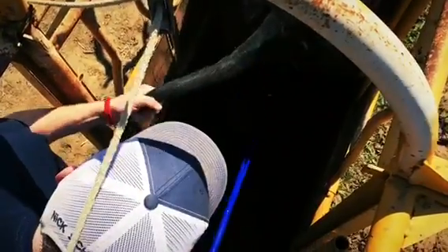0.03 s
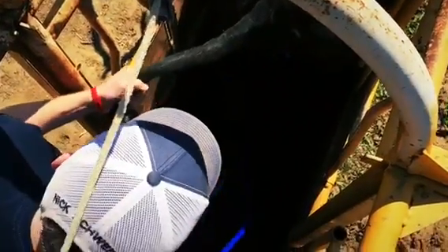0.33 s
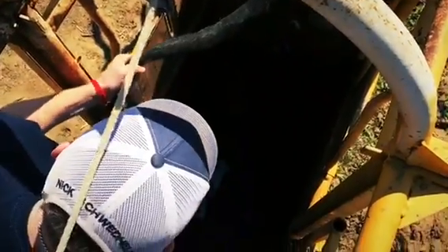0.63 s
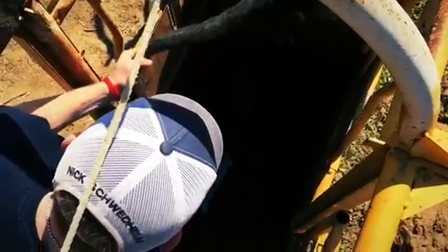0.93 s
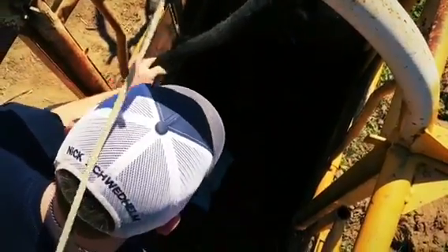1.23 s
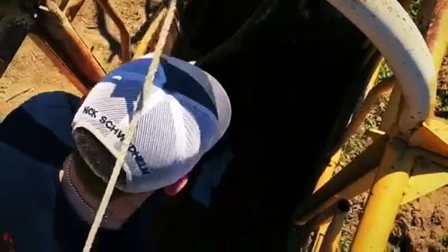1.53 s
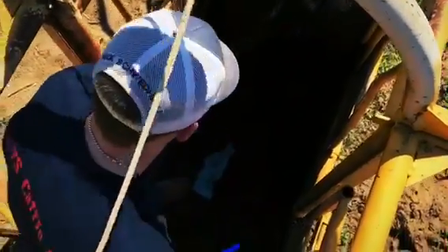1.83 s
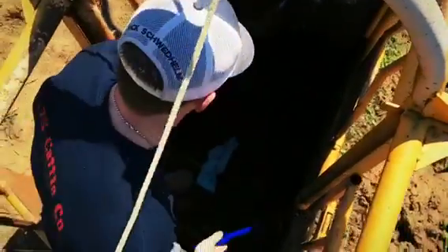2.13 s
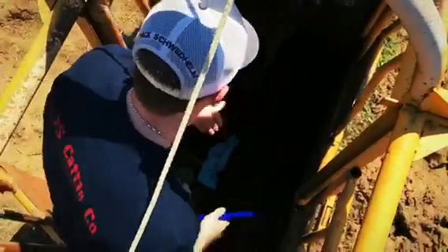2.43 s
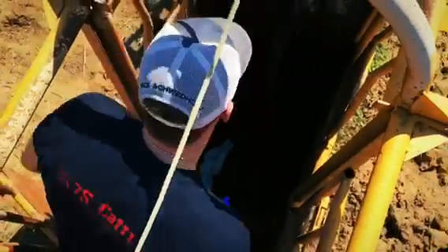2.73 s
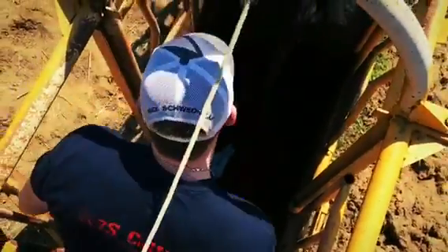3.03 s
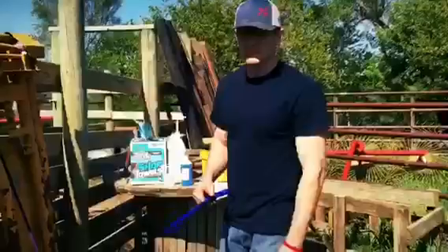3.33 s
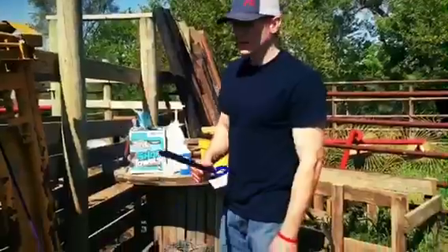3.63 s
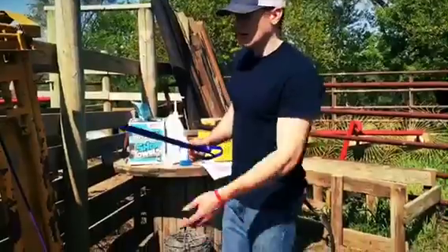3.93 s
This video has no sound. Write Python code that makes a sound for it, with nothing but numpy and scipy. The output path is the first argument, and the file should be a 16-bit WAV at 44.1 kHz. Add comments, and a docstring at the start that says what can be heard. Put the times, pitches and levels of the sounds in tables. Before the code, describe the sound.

A metal gate bangs shut near the end of a quiet outdoor stretch. Before it, wind puffs hit the microphone, a small bird whistles faintly and pipes clink lightly. A latch clanks just ahead of the ringing slam.

```python
"""A quiet farmyard, by a steel cattle chute. Light wind puffs on the microphone over a soft hiss and
a low hum, perhaps a far motor. A rail squeaks faintly, clothes rustle, a hand slides on a rope, a small
bird whistles in the trees and pipes clink twice. Then the chute's latch clanks and its gate slams:
the struck steel rings in its modes, the frame rattles and drones on, and the pens around answer."""
import sys
import numpy as np
from scipy import signal
from scipy.fft import rfft, irfft, next_fast_len
from scipy.io import wavfile
from scipy.ndimage import map_coordinates

SR = 44100
rng = np.random.default_rng(int(sys.argv[2]) if len(sys.argv) > 2 else 0)


def wrap_up_sound(samples):
    """Save the sound to the file named by the first command line argument, as 16-bit audio."""
    columns = np.atleast_2d(samples).T
    # keep every value between -1 and 1, then stretch to whole-number steps
    tamed = np.clip(columns, -1, 1)
    steps = np.round(tamed * 32767).astype(np.int16)
    wavfile.write(sys.argv[1], SR, steps)


N = 176400
T = np.arange(N) / SR

# wind rumble on the microphone (time [s], level [dB])
WIND_LEVEL = [(0, -52), (1.6, -49.5), (2.1, -43.5), (4, -52)]
# its spectrum (frequency [Hz], relative level [dB])
WIND_COLOUR = [(22, -23), (55, 6.5), (110, -6.5), (220, -12), (900, -58.5)]
# eddies hitting the microphone (time [s], level [dB], starting pitch [Hz])
PUFFS = [(1.046, -37, 200), (1.231, -36, 302), (1.256, -30, 290), (1.412, -36.5, 195), (1.81, -34, 255),
         (1.969, -32, 170), (2.07, -26.5, 283), (2.083, -21.5, 253), (2.108, -30.5, 202),
         (2.135, -28.5, 202), (2.302, -32, 280), (2.365, -14, 436), (2.4057, -19, 277), (2.713, -33, 201)]
# hollow rush behind an eddy (frequency [Hz], relative level [dB])
CHURN_COLOUR = [(300, 5), (750, -8.5), (4000, -58.5)]
# far hum, harmonics 1 to 3 (starting level [dB])
HUM_HARMONICS = [-50, -57, -66]
# hiss of the open yard (time [s], level [dB])
AIR_LEVEL = [(0, -59.5), (.22, -62), (.45, -69.5), (1.3, -64), (1.7, -67), (3.3, -65.5), (4, -49)]
# its spectrum (frequency [Hz], relative level [dB])
AIR_COLOUR = [(300, 7.5), (500, 0.5), (1800, -2.5), (3000, -9.5), (6000, -16.5), (15500, -26)]
# rustles of cloth and rope (time [s], length [s], level [dB])
RUSTLES = [(1.028, 0.023, -63), (1.07, 0.53, -71)]
# their spectrum (frequency [Hz], relative level [dB])
CLOTH_COLOUR = [(300, -33), (1500, 4), (5000, -2.5), (15000, -15)]
# slides on the rope (time [s], length [s], start pitch [Hz], end pitch [Hz], level [dB])
SCRAPES = [(1.117, 0.057, 1650, 2900, -65.5), (1.139, 0.048, 3350, 6400, -67),
           (1.2, 0.051, 7360, 8500, -71)]
# bird notes (delay [s], length [s], start [Hz], middle [Hz], end [Hz], relative level [dB])
SLOW_MOTIF = [(0, 0.038, 3840, 3575, 2930, -2), (.045, 0.05, 3650, 4290, 4480, -2.5),
              (.11, .07, 6250, 5400, 4980, -5.5)]
QUICK_MOTIF = [(0, .045, 6400, 5440, 4620, -1.5), (.085, 0.028, 3950, 3830, 3660, -5.5),
               (.12, .036, 3200, 3700, 4080, 1)]
# repeats of each motif (time [s], level [dB])
SLOW_SONG = [(1.458, -68), (1.71, -63.5), (1.963, -65)]
QUICK_SONG = [(2.268, -67.5), (2.535, -69), (2.812, -71.5)]
# each steel part's crowd of lesser modes (frequency [Hz], relative level [dB])
PIPE_COLOUR = [(200, -16), (900, -4), (2400, 3.5), (2700, -4), (3200, -2), (15000, -36)]
LATCH_COLOUR = [(100, -9), (500, -11), (850, 1), (2100, -1), (2600, -8.5), (3700, -1), (4800, -17),
                (9000, -23), (15500, -44)]
GATE_COLOUR = [(50, -20), (140, -6.5), (380, -7.5), (600, 0.5), (1300, 2), (2400, 2.5), (3500, -7),
               (5500, -12.5), (8000, -17.5), (11400, -19), (12800, -24.5), (15500, -33)]
FRAME_COLOUR = [(60, -37), (200, 1), (350, 5), (1200, -6.5), (6000, -50)]
# decay of those lesser modes (frequency [Hz], T60 [s])
STEEL_T60 = [(150, 0.15), (1500, 0.17), (13000, 0.11)]
# each part's clear modes (frequency [Hz], relative level [dB], T60 [s])
PIPE_MODES = [(1205, -4, .4), (1605, -12, 3.6), (1696, -5.5, 2.9), (1780, -5.5, 1.2), (2054, -8, .9),
              (2237, -4, .65)]
LATCH_MODES = [(760, -5, 1), (2850, -10, 0.074)]
FRAME_MODES = [(131.1, -5, 1.35), (216.6, -6.5, 0.92), (257.9, -7.5, 6), (334.3, -2.5, 0.53),
               (421, -7, 2.1)]
# the gate's clear modes (frequency [Hz], relative level [dB])
GATE_MODES = [(140.9, -0.5), (570, -3), (916, -5), (1058, -2.5), (1431, -10), (1583, -6), (1682, -8),
              (1760, -8.5), (1854, -8.5), (1987, 3), (2316, -9), (2500, -8), (2671, -8.5), (2805, -13),
              (3348, -9), (3547, -6), (4166, -8.5), (5642, -17.5), (5836, -16)]
# taps on small pipes (time [s], level [dB], factor on mode frequencies [ratio])
CLINKS = [(1.857, -61, .935), (2.506, -50, 0.99)]
# reverberation of the pens (frequency [Hz], T60 [s], gain [dB])
PEN_REVERB = [(347, 4, -3), (895, 0.8, -15.5), (2180, .42, -11), (13000, 0.33, -17)]
# blows on the gate (time [s], level [dB], treble tilt [dB/octave])
GATE_BLOWS = [(3.37, -51, -6.5), (3.5586, -16.5, 0.5), (3.5657, -16, 1.56), (3.607, -33.5, -3.5),
              (3.789, -44.5, -1.5), (3.945, -43, -4), (3.958, -40.5, -5)]
# latch contacts (time [s], level [dB])
LATCH_HITS = [(3.4295, -26.5), (3.439, -43)]
# jolts of the heavy frame (time [s], level [dB])
FRAME_JOLTS = [(3.455, -26), (3.575, -28.5), (3.925, -35)]


def amp(db):
    """Decibels to gain."""
    return 10 ** (np.asarray(db) / 20)


def unit(x):
    """Scale to rms 1."""
    return x / np.sqrt(np.mean(x ** 2) + 1e-20)


def along(points, hz):
    """Read (frequency [Hz], value) points on a log axis."""
    freqs, values = np.transpose(points)
    return np.interp(np.log(hz + 1), np.log(freqs + 1), values)


def level(points):
    """Gain per sample from (time [s], level [dB]) points."""
    return amp(np.interp(T, *np.transpose(points)))


def wobble(rate, size=N):
    """A smooth random curve, rate knots a second."""
    return map_coordinates(rng.standard_normal(int(size * rate / SR) + 4), [T[:size] * rate])


def filtered(x, response):
    """Filter x by a gain that depends on frequency."""
    padded = next_fast_len(len(x) + 8192)
    return irfft(rfft(x, padded) * response(np.fft.rfftfreq(padded, 1 / SR)), padded)[:len(x)]


def noise(colour, size=N):
    """Coloured noise of rms 1."""
    return unit(filtered(rng.standard_normal(size), lambda hz: amp(along(colour, hz))))


def add(track, s, sound):
    """Mix a sound into the track at time s."""
    part = track[round(s * SR):][:len(sound)]
    part += sound[:len(part)]


def dying(x, t60s):
    """Each frequency of x dies at its own speed."""
    hz, t, spectrum = signal.stft(x, SR, nperseg=256)
    decay = amp(-60 * t / along(t60s, hz)[:, None])
    return signal.istft(spectrum * decay, SR, nperseg=256)[1][:len(x)]


def wind(sag_cycles=1.506, peak_cycles=1.164, snap_delay_s=0.00287, snap_s=0.00028, churn_t60=0.1):
    """Wind right on the microphone: a lumpy rumble, and eddies that thump with a falling pitch."""
    out = amp(2.2 * wobble(37)) * level(WIND_LEVEL) * noise(WIND_COLOUR)
    t = T[:SR // 5]
    edge = (t - snap_delay_s) / snap_s
    snap = 2 * edge / (1 + edge ** 2) * np.exp(-(edge / 3.5) ** 2)
    for s, db, hz in PUFFS:
        cycles = sag_cycles * np.log1p(hz * t / sag_cycles)
        age = cycles / peak_cycles
        thump = (age * np.exp((1 - age ** 2) / 2)) ** 0.815 * np.sin(2 * np.pi * cycles)
        churn = noise(CHURN_COLOUR, len(t)) * amp(-60 * t / churn_t60) * np.minimum(t / snap_delay_s, 1)
        # only the hardest eddies snap and churn audibly
        add(out, s, amp(db) * thump + amp(21 + 3.32 * db) * snap + amp(-9 + 1.666 * db) * churn)
    return out


def motor(hum_hz=62.23, fade_db_per_s=2):
    """Far off, perhaps a motor: a slightly unsteady hum that slowly fades."""
    turns = np.cumsum(hum_hz * (1 + 0.01188 * wobble(4.88))) / SR
    hum = sum(amp(db + 3 * wobble(4.72)) * np.sqrt(2) * np.sin(2 * np.pi * k * turns)
              for k, db in enumerate(HUM_HARMONICS, 1))
    return amp(-fade_db_per_s * T) * hum


def air():
    """The open yard: a soft hiss that swells at the end."""
    return level(AIR_LEVEL) * amp(0.33 * wobble(7.7)) * noise(AIR_COLOUR)


def rail_squeak(start_s=0.605, length_s=0.12, pitch_hz=756, half_width_hz=66, db=-66.5):
    """A faint, hoarse rub on a rail: narrow noise bands in a harmonic row."""
    def bands(hz):
        peaks = sum(1 / (1 + ((hz - k * pitch_hz) / half_width_hz) ** 2) for k in range(1, 11))
        return peaks / np.hypot(hz, 5 * pitch_hz)

    out, size = np.zeros(N), int(length_s * SR)
    rub = unit(filtered(rng.standard_normal(size), bands))
    add(out, start_s, amp(db) * signal.windows.tukey(size) * rub)
    return out


def rustles():
    """Short grainy swishes of cloth and rope."""
    swell = np.zeros(N)
    for s, length, db in RUSTLES:
        add(swell, s, amp(db) * signal.windows.tukey(int(length * SR), 0.7))
    return swell * amp(1.2 * wobble(90)) * noise(CLOTH_COLOUR)


def rope_scrapes(relative_width=0.3):
    """A hand slides on the rope: narrow hisses that rise in pitch."""
    out = np.zeros(N)
    for s, length, from_hz, to_hz, db in SCRAPES:
        size = int(length * SR)
        phase = 2 * np.pi * np.cumsum(np.linspace(from_hz, to_hz, size)) / SR
        hiss = sum(wobble(relative_width * to_hz, size) * wave(phase) for wave in (np.sin, np.cos))
        add(out, s, amp(db) * np.hanning(size) * unit(hiss))
    return out


def bird(echo_t60=0.34):
    """Off in the trees, a small bird whistles two gliding motifs, three times each, with an echo."""
    dry = np.zeros(N)
    for motif, song in (SLOW_MOTIF, SLOW_SONG), (QUICK_MOTIF, QUICK_SONG):
        for s, db in song:
            for delay, length, *pitches, note_db in motif:
                progress = np.linspace(0, 1, int(length * SR))
                glide = np.polyval(np.polyfit([0, 0.5, 1], pitches, 2), progress)
                hz = glide * (1 + rng.normal(0, 0.0089))
                arch = np.sqrt(np.abs(np.sin(np.pi * progress)))
                add(dry, s + delay, amp(db + note_db) * arch * np.sin(2 * np.pi * np.cumsum(hz) / SR))
    dry *= amp(2.8 * wobble(190))  # the level flutters
    echo = rng.standard_normal(SR // 2) * amp(-60 * T[:SR // 2] / echo_t60)
    return dry + amp(-1) * signal.fftconvolve(dry, echo / np.linalg.norm(echo))[:N]


def struck(s, db, colour, modes, ring_db, tilt_db=0, attack_s=0.00022):
    """One blow on steel: a clash of many short modes, and clear ones that ring a little unsteadily."""
    out, t = np.zeros(N), T[:SR]
    tilt = lambda hz: amp(tilt_db * np.log2(np.clip(hz, 200, 8000) / 1500))
    clash = dying(unit(filtered(noise(colour, SR), tilt)), STEEL_T60)
    ring = np.zeros(SR)
    scatter = rng.standard_normal((len(modes), 2))
    for (hz, mode_db, t60), (stray_db, half_turns) in zip(modes, scatter):
        phase = 2 * np.pi * hz * t + np.pi * half_turns + 0.52 * wobble(40.5, SR)
        ring += tilt(hz) * amp(mode_db + stray_db - 60 * t / t60) * np.sin(phase)
    add(out, s, amp(db) * (clash + amp(ring_db) * ring) * (1 - np.exp(-t / attack_s)))
    return out


def pipes():
    """Light taps on ringing pipes of slightly different length."""
    out = np.zeros(N)
    for s, db, pitch in CLINKS:
        modes = [(hz * pitch, mode_db, t60) for hz, mode_db, t60 in PIPE_MODES]
        out += struck(s, db, PIPE_COLOUR, modes, ring_db=-8)
    return out


def pens(x):
    """Rails and boards around the microphone keep the sound going, longest in the bass."""
    t60s = [(hz, t60) for hz, t60, _ in PEN_REVERB]
    gains = [(hz, db) for hz, _, db in PEN_REVERB]
    unit_energy = lambda hz: np.sqrt(2 * np.log(1000) / (SR * along(t60s, hz)))
    tail = dying(rng.standard_normal(SR), t60s)
    tail = filtered(tail, lambda hz: amp(along(gains, hz)) * unit_energy(hz))
    return signal.fftconvolve(x, tail)[:N]


def chute(gate_t60=0.17, slap_hz=1210, slap_cycles=0.71, slap_boost_db=14):
    """The latch lets go, the gate slaps its stop, rings and rattles, the frame shudders."""
    latch = sum(struck(s, db, LATCH_COLOUR, LATCH_MODES, ring_db=-6) for s, db in LATCH_HITS)
    modes = [(hz, db, gate_t60) for hz, db in GATE_MODES]
    gate = sum(struck(s, db, GATE_COLOUR, modes, ring_db=-7.5, tilt_db=tilt)
               for s, db, tilt in GATE_BLOWS)
    # on the hardest blow the flat of the gate meets its stop
    s, db, _ = max(GATE_BLOWS, key=lambda blow: blow[1])
    cycles = slap_hz * T[:SR // 20]
    slap = np.exp(-(cycles / slap_cycles) ** 2) * np.sin(2 * np.pi * cycles)
    add(gate, s, amp(db + slap_boost_db) * slap)
    frame = sum(struck(s, db, FRAME_COLOUR, FRAME_MODES, ring_db=-12.5) for s, db in FRAME_JOLTS)
    return latch + gate + frame


def scene():
    """At one microphone: the steel and its echo over the sounds of the yard."""
    steel, clinks = chute(), pipes()
    yard = wind() + motor() + rustles() + rope_scrapes() + rail_squeak() + bird() + air()
    echo = pens(steel + amp(12) * clinks)  # more echo sets the clinks farther off
    return (steel + clinks + echo + yard)[None]


def record(dry, ceiling=0.7, low_cut_hz=38, top_hz=15700):
    """The microphone rounds off the highest peaks, thins the lowest bass and cuts the top treble."""
    rounded = dry / (1 + (dry / ceiling) ** 6) ** (1 / 6)
    low_cut = lambda hz: (hz / low_cut_hz) ** 4 / np.sqrt(1 + (hz / low_cut_hz) ** 8)
    passband = lambda hz: low_cut(hz) / np.sqrt(1 + (hz / top_hz) ** 200)
    return np.array([filtered(channel, passband) for channel in rounded])


dry = scene()
out = record(dry)
wrap_up_sound(out)
```